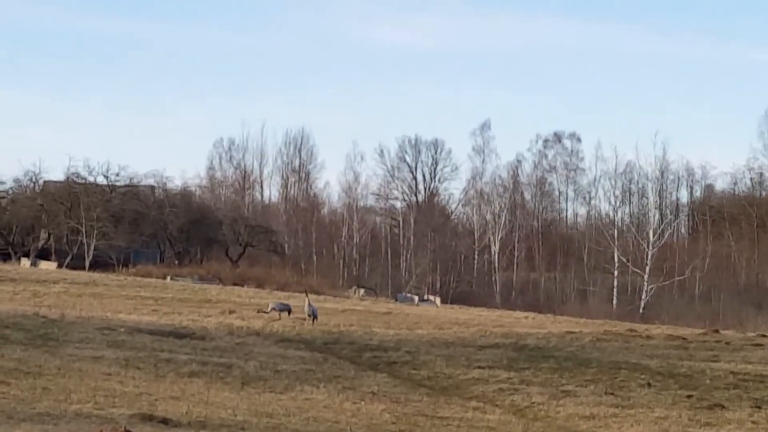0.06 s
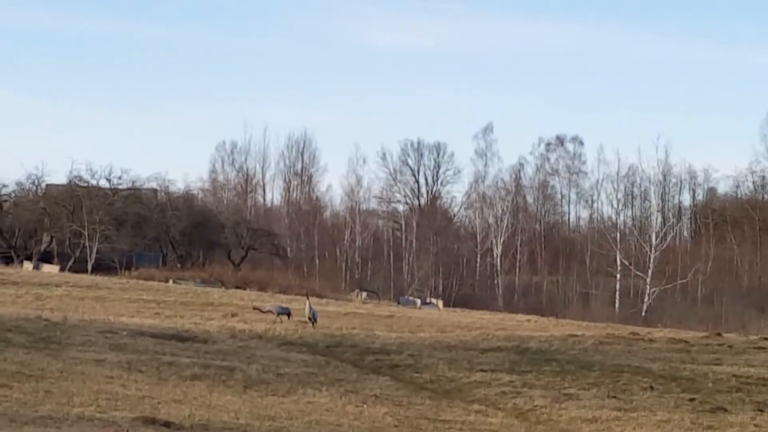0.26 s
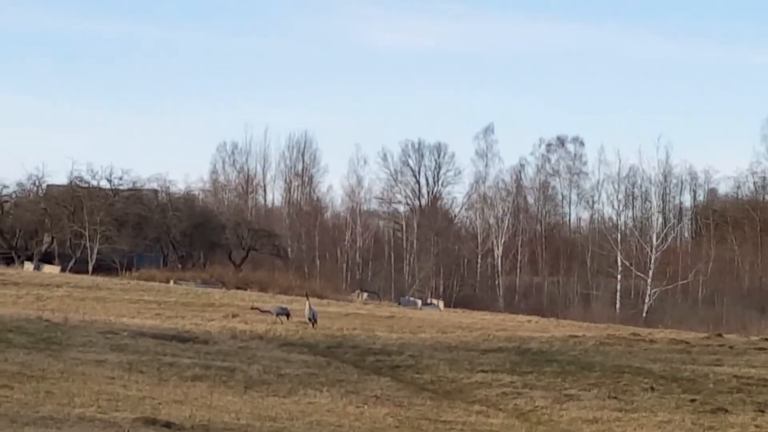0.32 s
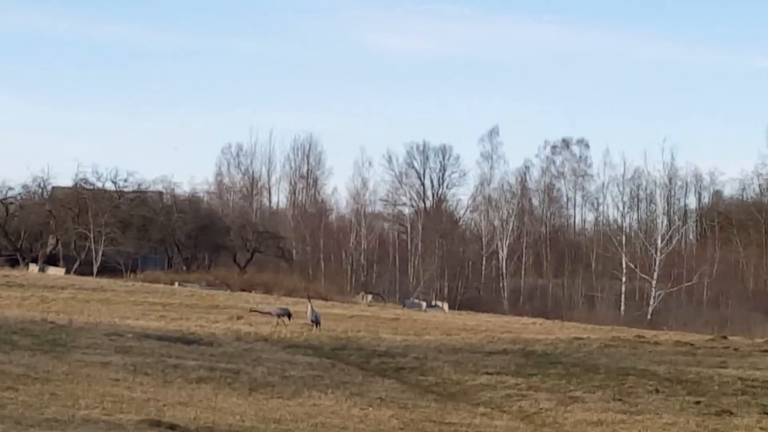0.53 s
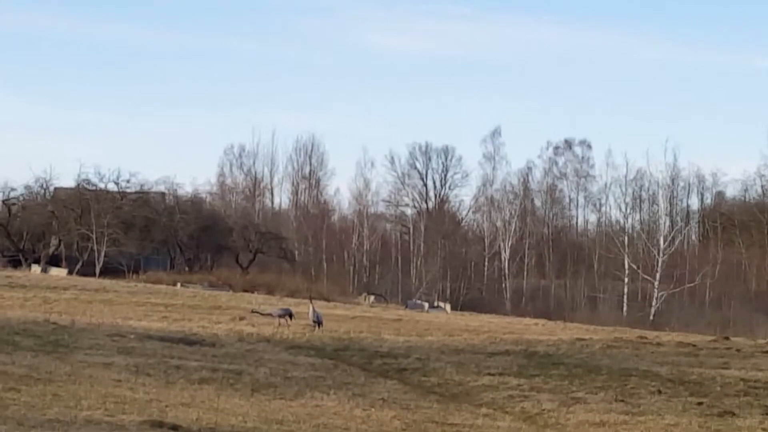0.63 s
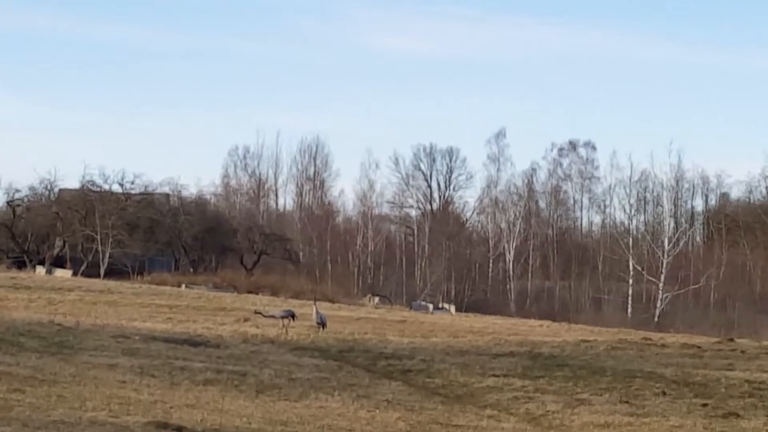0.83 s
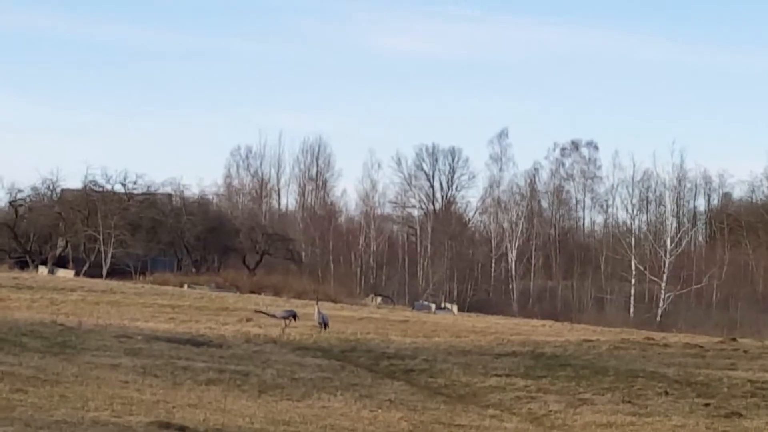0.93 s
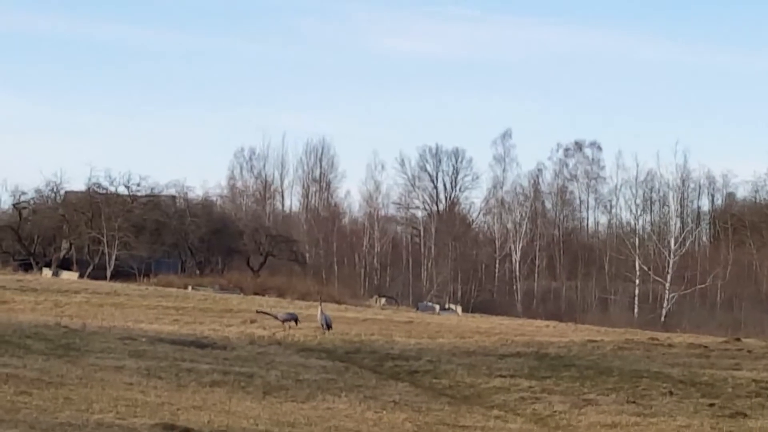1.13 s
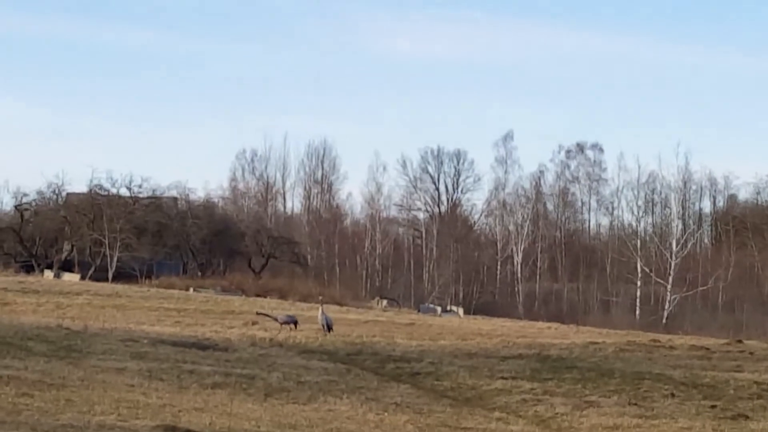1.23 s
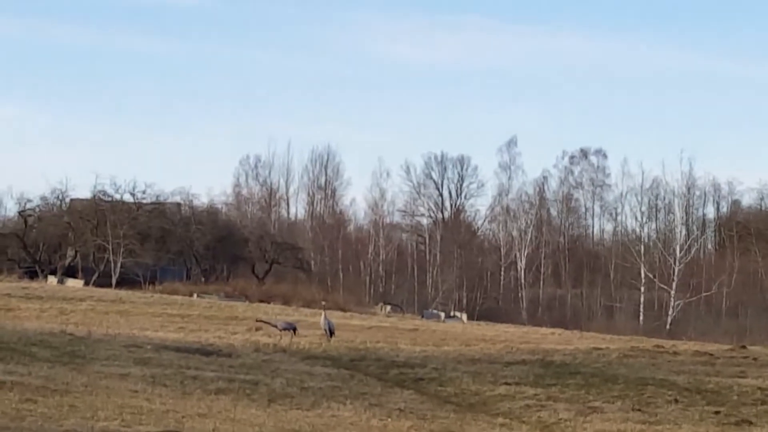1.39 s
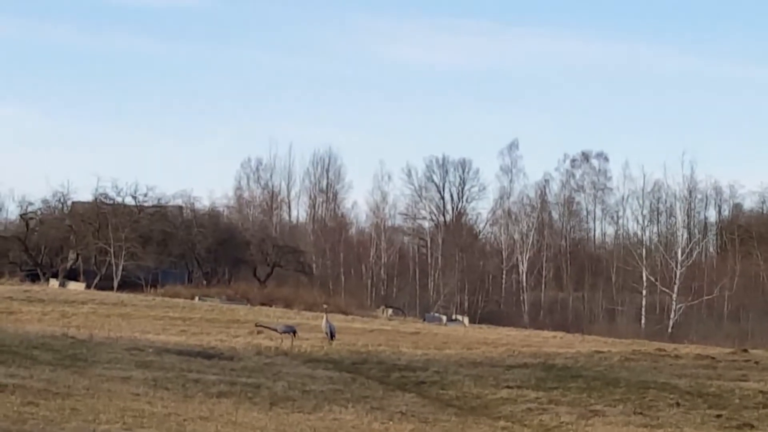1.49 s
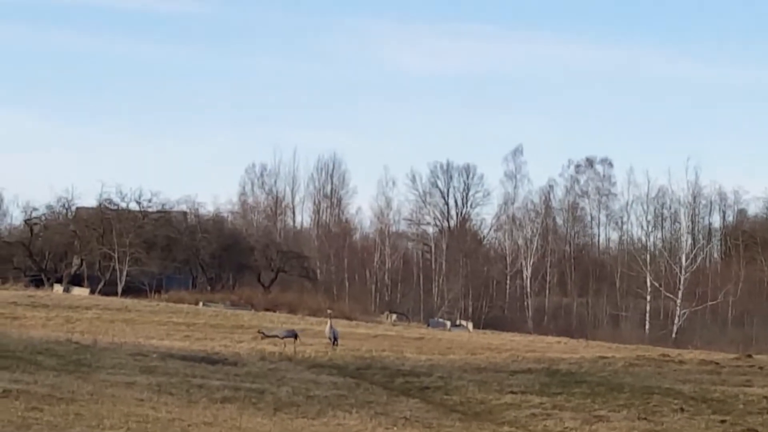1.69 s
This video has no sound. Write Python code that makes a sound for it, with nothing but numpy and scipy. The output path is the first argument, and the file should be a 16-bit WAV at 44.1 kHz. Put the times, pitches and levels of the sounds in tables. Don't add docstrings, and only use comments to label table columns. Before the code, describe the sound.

Loud brassy crane calls, one high and one lower, echo thinly off distant bare trees

```python
import sys
import numpy as np
from scipy import signal
from scipy.fft import rfft, irfft, next_fast_len
from scipy.io import wavfile

SR = 44100
rng = np.random.default_rng(int(sys.argv[2]) if len(sys.argv) > 2 else 0)


def waveform_to_disk(signal):
    frames = np.transpose(np.atleast_2d(signal))
    scaled = np.clip(frames, -1, 1) * 32767
    samples = np.round(scaled).astype(np.int16)
    wavfile.write(sys.argv[1], SR, samples)


def invert_db(level):
    return 10 ** (np.asarray(level, dtype=float) / 20)


N = 77175
T = np.arange(N) / SR
SIZE = next_fast_len(2 * N)
HZ = np.fft.rfftfreq(SIZE, 1 / SR)
CLEAN, HAZE, RASP = .004, .022, .15
FAST_SHAKE, PIPE_SHAKE, HALF = .4235, .0915, .5
SLOW_FADE_S = .09


def rms_one(x):
    return x / np.sqrt(np.mean(x ** 2) + 1e-20)


def at_hz(points, hz):
    p = np.array(points, float)
    return np.interp(np.log(hz + 1), np.log(p[:, 0]), p[:, 1])


def drift(rate_hz):
    r = np.exp(-2 * np.pi * rate_hz / SR)
    wander = signal.lfilter([1], [1, -2 * r, r * r], rng.standard_normal(N + SR))
    return rms_one(wander[SR:])


def bands(shape):
    edges = 20 * 2 ** np.arange(0, 10.1, .5)
    white = rng.standard_normal((2, 2, N))
    out = 0
    for k, (low, high) in enumerate(zip(edges, edges[1:])):
        band = signal.butter(2, [low, high], "band", fs=SR, output="sos")
        mid, side = signal.sosfilt(band, white[k % 2])
        gain, alike = shape(np.sqrt(low * high))
        out = out + gain * (np.sqrt(1 + alike) * mid + np.sqrt(1 - alike) * side * [[1], [-1]])
    return out


def wind():
    # freq_hz, level_db
    colour = [(20, -1), (70, -2), (180, -10), (550, -16.5), (1100, -21), (2500, -24.5), (4200, -27.5),
              (15500, -34.5)]
    # freq_hz, likeness (0-1)
    likeness = [(30, 0.98), (100, 0.7), (500, 0.31), (3000, 0), (12000, 0.033)]
    gust_db = 2.0 * drift(2.4) + 2.0 * drift(25)
    air = bands(lambda hz: (invert_db(at_hz(colour, hz) + gust_db * (hz < 400)), at_hz(likeness, hz)))
    air = signal.sosfilt(signal.butter(2, 51, "high", fs=SR, output="sos"), air)
    return invert_db(-65.5) * rms_one(air)


def distant_hum():
    hum_hz, hum_db = 1361, -73
    level = invert_db(hum_db + 2 * drift(4)) * np.sqrt(2)
    return level * np.sin(2 * np.pi * hum_hz * T + .3 * drift(5))


def soft_knock():
    centre_s, knock_hz, width_s = 1.092, 165, .0035
    late = T - centre_s
    knock = invert_db(-52) * np.exp(-.5 * (late / width_s) ** 2) * np.sin(2 * np.pi * knock_hz * late)
    return knock * invert_db(np.array([[2.5], [-2.5]]))


def trees(x):
    # freq_hz, t60_s
    far_t60 = [(700, 4), (1100, 2.0), (2000, 2), (3200, 1.0), (8000, 1)]
    # freq_hz, level_db
    colour = [(500, -6), (800, -10.5), (1100, -11.5), (2000, -24), (3100, -23.5), (4200, -24.5),
              (8000, -47)]
    start_s, swell_s = 0.046, 0.021
    bushes_db, bushes_t60_s = 4, 0.44
    late = np.maximum(T - start_s, 0)
    swell = (1 - np.exp(-late / swell_s)) / np.sqrt(SR / 10)
    near = invert_db(bushes_db - 60 * late / bushes_t60_s)

    def returns(hz):
        far = invert_db(-60 * late / at_hz(far_t60, hz))
        return swell * invert_db(at_hz(colour, hz)) * (near + far), .1

    return irfft(rfft(bands(returns), SIZE) * rfft(x, SIZE), SIZE)[:, :N]


def place(x, side, lead):
    half = np.array([[.5], [-.5]])
    level = invert_db(half * at_hz(side, HZ))
    turn = np.exp(1j * half * at_hz(lead, HZ))
    return irfft(rfft(x, SIZE) * level * turn, SIZE)[:, :N]


def windpipe(x, pipe, note_hz, hollows, laps):
    floor_hz = 418
    returned = 0.11
    db = at_hz([(k * note_hz, d) for k, d in pipe] + [(SR / 2, -70)], HZ)
    db = db - sum(d * np.exp(-.5 * ((HZ - f) / w) ** 2) for f, w, d in hollows)
    db = db - 10 * np.log10(1 + (floor_hz / (HZ + 20)) ** 6)
    cep = irfft(np.log(invert_db(db)), SIZE)
    cep[1:SIZE // 2] *= 2
    cep[SIZE // 2 + 1:] = 0
    response = np.exp(rfft(cep))
    trips = (1 - returned) / (1 - returned * np.exp(-2j * np.pi * HZ * laps / note_hz))
    return irfft(rfft(x, SIZE) * response * trips, SIZE)[:N]


def syrinx(rows, shakes, pulses, pulse_db, dull_start):
    jitter_hz = 550
    dulling_db = 0.28
    spread_rad = 0.22
    start_s, pitch_hz, level_db, jitter_rad = np.transpose(rows)
    hz = np.interp(T, start_s, pitch_hz)
    db = np.interp(T, start_s, level_db, left=-200, right=-200)
    cycle = 2 * np.pi * np.cumsum(hz) / SR
    rough = np.interp(T, start_s, jitter_rad)
    phase = cycle + rough * drift(jitter_hz)
    strength = 1 + 1.1 * rough * drift(jitter_hz)

    for start, end, fade, share, swing, depth in shakes:
        fades = np.clip(np.minimum(T - start, end - T) / (2 * fade), 0, 1)
        on = np.sin(np.pi / 2 * fades) ** 2
        phase = phase + on * swing * np.sin(share * cycle)
        strength = strength * (1 + on * depth * np.cos(share * cycle))

    dull = dulling_db * (db - level_db.max()) * np.where(T > start_s[level_db.argmax()], 1, dull_start)
    train = 0
    for k in range(1, 24):
        harmonic = np.cos(k * phase - spread_rad * k ** 2) * (k * hz < 16000)
        train = train + invert_db(dull * np.log2(k)) * harmonic

    lone = np.full(N, 1e-18)
    for at, peak_db in pulses:
        lone[int(at * SR)] = -invert_db(peak_db + pulse_db)
    soft = signal.sosfilt(signal.butter(2, 2250, fs=SR, output="sos"), lone)
    return train * strength * invert_db(db) + soft


def first_crane():
    # start_s, pitch_hz, level_db, jitter_rad
    rise = [
        (.180, 875.5, -85, 0.72),
        (.183, 854, -43.5, 0.59),
        (.198, 948, -35.5, 0.34),
        (.212, 944, -34.5, RASP),
        (.262, 960, -29, RASP),
        (.274, 1036, -29.5, RASP),
        (.295, 1031, -28.5, HAZE),
    ]
    hold = [
        (.38, 1029, -28, HAZE),
        (0.441, 1027, -27.5, 0.098),
        (.50, 1024, -27, HAZE),
        (0.557, 1012, -29, HAZE),
        (0.579, 993, -30.5, HAZE),
    ]
    fall = [
        (0.587, 975.4, -30, 0.049),
        (0.595, 939.4, -33, 0.12),
        (0.61, 924, -32.5, .04),
        (.654, 897.4, -35.5, HAZE),
        (0.666, 867.4, -36.5, 0.049),
        (0.712, 818, -39, HAZE),
        (.728, 800, -48, 0.11),
        (0.784, 750, -53, .7),
        (.80, 805, -95.5, .8),
    ]
    # start_s, end_s, fade_s, rate (share of pitch), swing_rad, depth (0-1)
    shakes = [
        (0.182, 0.305, 0.028, PIPE_SHAKE, 0.39, .15),
        (.32, 0.556, 0.057, FAST_SHAKE, 0.33, 0.16),
        (0.596, 0.617, 0.0043, 0.1, 0.25, 1),
        (0.633, 0.732, 0.015, 0.076, 0.24, 0.43),
    ]
    # start_s, peak_db
    pulses = [(.1815, -46), (.738, -53), (.757, -49), (.778, -53)]
    # harmonic of the held note (number), level_db
    pipe = [(1, -9.5), (2, 2.5), (3, 0.5), (4, -20.5), (5, -8), (6, -13), (7, -18.5), (8, -16.5),
            (9, -26.5), (10, -32), (11, -29.5), (12, -39), (13, -33.5), (14, -43)]
    # freq_hz, width_hz, depth_db (negative is a peak)
    hollows = [(695, 114, 7), (2626, 277, 13), (3690, 156, 11.5), (1226, 97, -3)]
    voice = syrinx(rise + hold + fall, shakes, pulses, pulse_db=37, dull_start=0.047)
    return -windpipe(voice, pipe, note_hz=1031, hollows=hollows, laps=12)


def second_crane():
    # start_s, pitch_hz, level_db, jitter_rad
    rise = [
        (1.03, 640, -56.5, 0.4),
        (1.043, 661.5, -48, 0.25),
        (1.058, 689.5, -44, 0.71),
        (1.075, 746.6, -40, 0.33),
        (1.098, 757, -34, 0.045),
        (1.115, 772, -35.5, CLEAN),
    ]
    fall = [
        (1.212, 777, -35.5, CLEAN),
        (1.32, 769.8, -35, CLEAN),
        (1.438, 763, -35, 0.0072),
        (1.521, 746.3, -36, .012),
        (1.553, 713, -39.5, .012),
        (1.564, 701.4, -40, 0.011),
        (1.583, 679, -48, 0.034),
        (1.589, 628, -43.5, 0.36),
        (1.68, 691, -54, 0.7),
    ]
    # start_s, end_s, fade_s, rate (share of pitch), swing_rad, depth (0-1)
    shakes = [
        (1.024, 1.099, 0.045, .28, 0.53, 0.23),
        (1.03, 1.096, 0.019, .1, 0.32, 0.32),
        (1.29, 1.666, SLOW_FADE_S, HALF, 0.037, 0.22),
    ]
    # start_s, peak_db
    pulses = [(1.037, -56), (1.045, -42), (1.047, -45), (1.0545, -48), (1.059, -44), (1.5955, -45),
              (1.603, -51), (1.616, -42), (1.632, -45), (1.643, -52), (1.659, -54)]
    # harmonic of the held note (number), level_db
    pipe = [(1, -11), (2, -1.5), (3, -11), (4, 2), (5, -3.5), (6, -10), (7, -16), (8, -16.5), (9, -17.5),
            (10, -34.5), (11, -30), (12, -26.5), (13, -40), (14, -30), (15, -31), (16, -22), (17, -34)]
    # freq_hz, width_hz, depth_db (negative is a peak)
    hollows = [(1088, 50, 9), (2015, 102, -13.5)]
    voice = syrinx(rise + fall, shakes, pulses, pulse_db=36, dull_start=0.56)
    return windpipe(voice, pipe, note_hz=775, hollows=hollows, laps=9)


def scene():
    # freq_hz, level_db
    first_side = [(60, -12), (180, 24), (550, -7), (1650, 3.5), (4970, 1.5), (15000, 1)]
    second_side = [(60, 0.0), (180, 0.0), (550, -0.77), (1650, -1.2), (4970, 0.9), (15000, -1.5)]
    # freq_hz, phase_rad
    first_lead = [(0, 0), (8530, 0.62), (9130, 5.5), (12400, 9.5), (14100, 17.5), (15200, 10.5)]
    second_lead = [(0, 0), (950, 0.63), (7240, 0.64), (8180, 0.2), (9040, -6), (15200, -3.5)]
    one, two = first_crane(), second_crane()
    birds = place(one, first_side, first_lead) + place(two, second_side, second_lead)
    echo = trees(one + two * invert_db(-6))
    return birds + echo + wind() + distant_hum() + soft_knock()


def top_cut(x):
    return signal.sosfilt(signal.butter(12, 15680, fs=SR, output="sos"), x)


def record(dry):
    return top_cut(dry)


dry = scene()
out = record(dry)
waveform_to_disk(out)
```